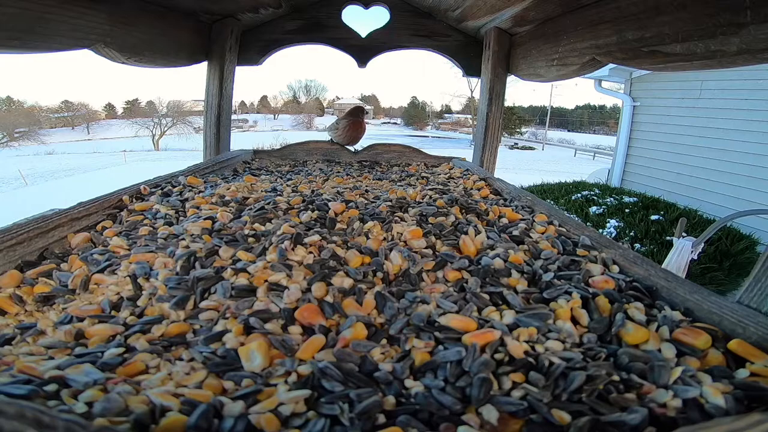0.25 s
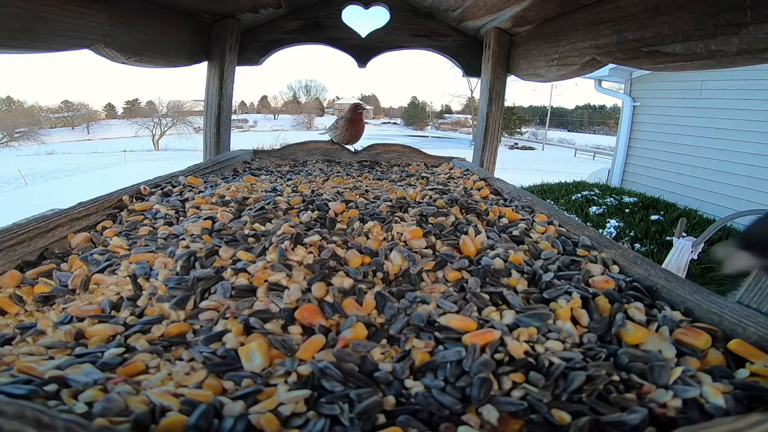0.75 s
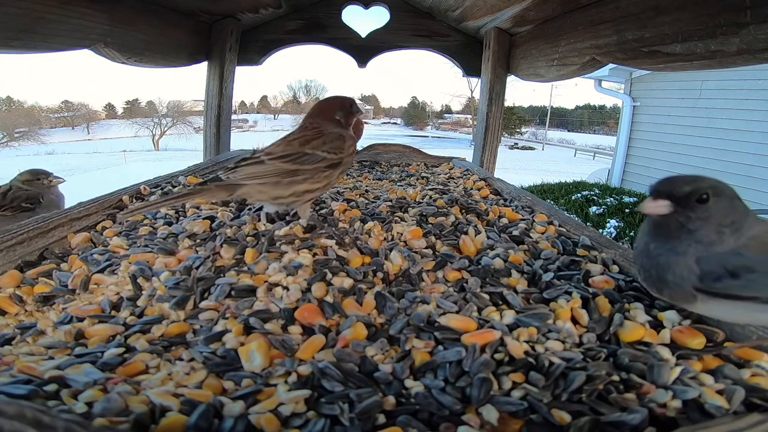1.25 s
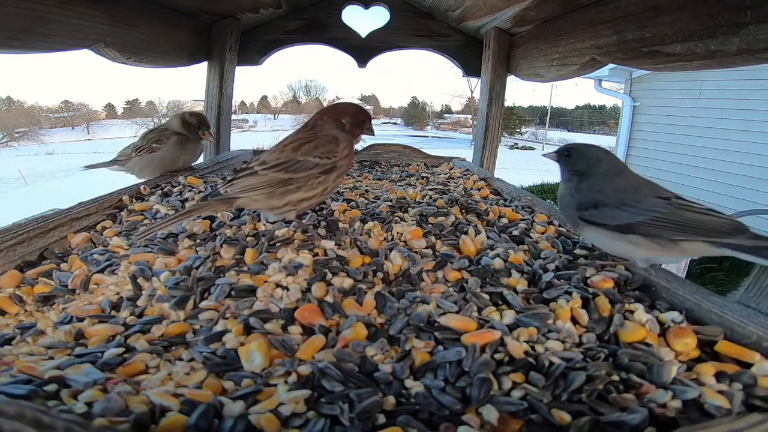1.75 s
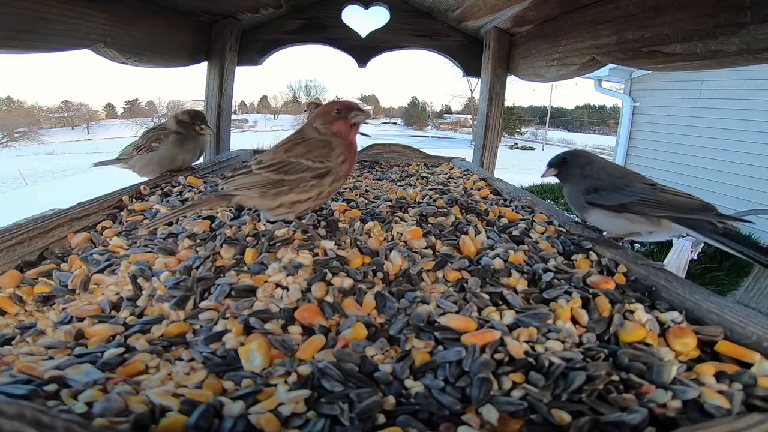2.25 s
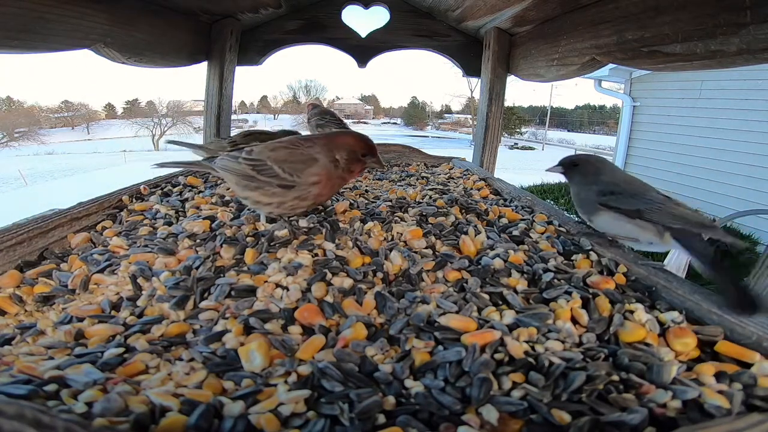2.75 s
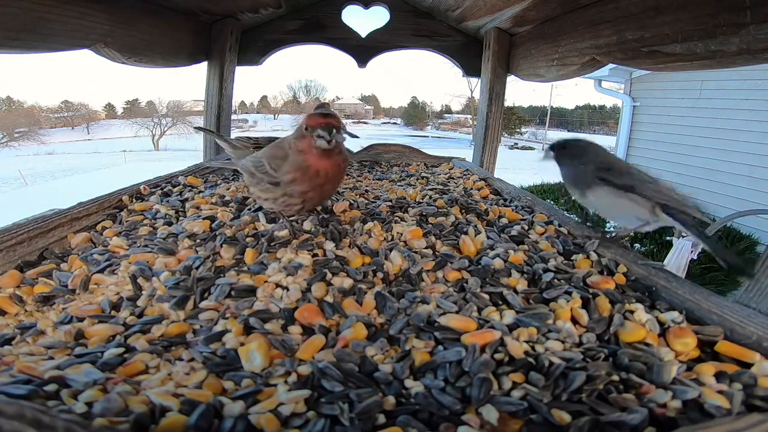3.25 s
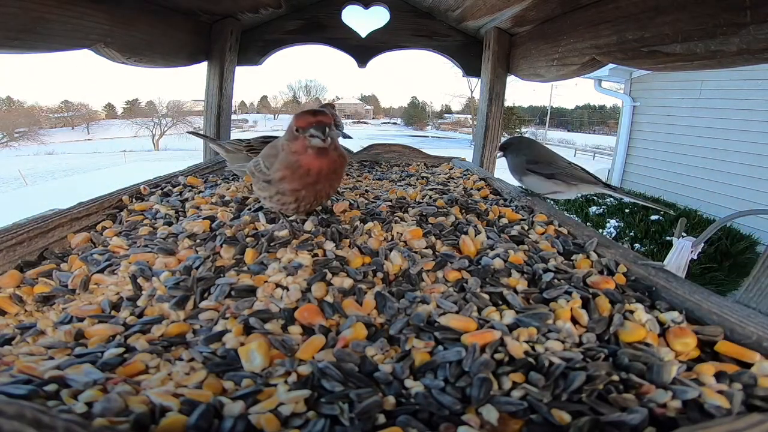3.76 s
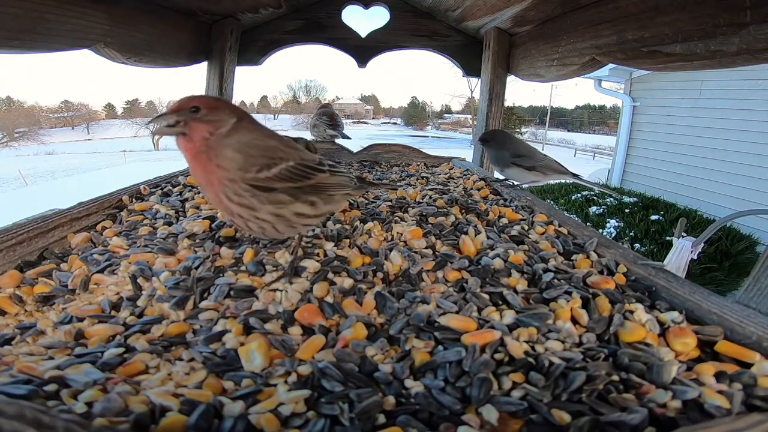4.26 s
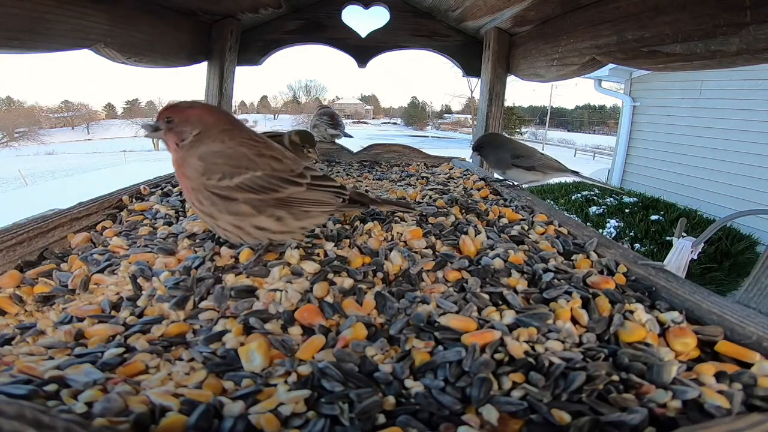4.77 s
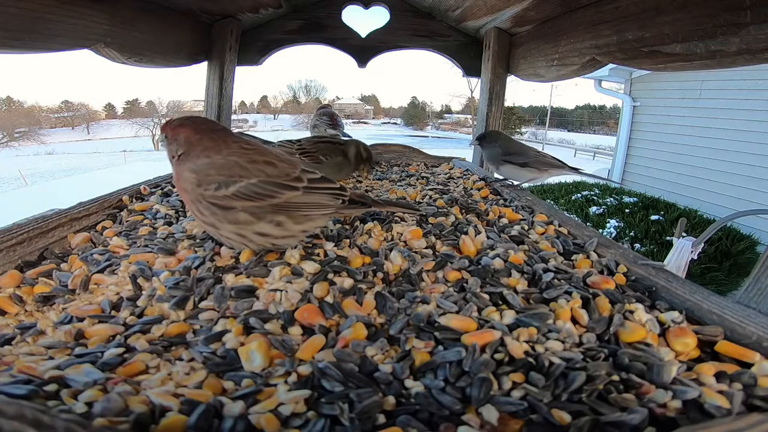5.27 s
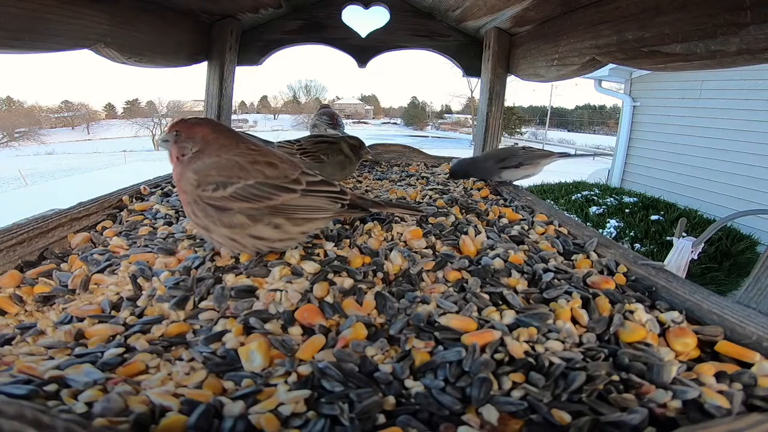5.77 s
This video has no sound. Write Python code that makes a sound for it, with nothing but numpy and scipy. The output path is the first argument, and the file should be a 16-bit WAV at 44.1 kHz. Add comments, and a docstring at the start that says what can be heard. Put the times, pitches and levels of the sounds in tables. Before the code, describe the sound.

At 0 s a wavering low hum with a dull rush, stronger on the right, fades out by about 0.85 s. A faint, high, warbling chirp droops near 0.4 s as soft seed rustle, distant traffic drone and slight hiss fade in. Around 1.0-1.3 s birds land: clustered muffled thuds on ringing boards, thin woody pings and quick husk ticks. A sharp bright crack comes at 1.54 s, then scattered ticks, shuffles and low thumps near 2 s. Dense dry clicking and stirring runs 3.3-3.75 s, with a wing puff thumping the microphone at 3.47. Another brisk scuffle follows at 4.1-4.2 s, then a quieter spell. Ticks cluster at 4.7; a firm woody knock lands at 5.06 and a husk burst at 5.65, among low air puffs. Nibbling grows narrower and calmer by 4.3 s, continuing to 6 s.

```python
"""The soft sounds fade in first, while a wavering low hum, mostly on the right, dies away; one bird chirps.
Small birds land, hop and peck in a deep bed of seed on a roofed wooden platform with a microphone on its edge.
Noise bursts make husks tick and rustle; feet thud by pushing ringing boards; claws and beaks ping the thin rim.
Later the rustle of nibbling narrows in colour as the birds settle to feed. Slow pulses and low noise make
puffs and gusts of air on the microphone; shaped noise makes the far traffic drone."""
import sys
import numpy as np
from scipy import signal
from scipy.fft import rfft, irfft
from scipy.io import wavfile
from scipy.ndimage import uniform_filter1d

SR = 44100
rng = np.random.default_rng(int(sys.argv[2]) if len(sys.argv) > 2 else 0)


def inscribe(sig):
    """Save sig as 16-bit PCM at rate SR to the path in sys.argv[1].

    A 1-D sig is mono; a 2-D sig holds one channel per row.
    Samples are clipped to [-1, 1] before scaling.
    """
    pcm = np.round(np.clip(np.atleast_2d(sig).T, -1, 1) * 32767)
    wavfile.write(sys.argv[1], SR, pcm.astype(np.int16))


def ratio_of_db(decibels):
    """Turn decibels (scalar or array-like) into linear amplitude factors; 0 dB maps to 1."""
    return 10 ** (np.asarray(decibels, float) / 20)


N = 265437
T = np.arange(N) / SR

SPLINTER_DB = 3.5  # scatter of the splinters' strength
SNAP_DB, SNAP_S = 8, .00012  # first crack over the crunch, and its decay
CRUNCH_RISE_S, CRUNCH_FALL_S, HUSK_RING_S = .0002, .0013, .0022
TICK_FALL_DB = 10.5  # level lost one octave from a tick's colour
TICK_FLANK_DB = (3.5, 0.5)  # dull and bright part against the middle
# Husks cracked, dropped or kicked. Each row: start in seconds, level in dB before the seed bed colours it,
# colour in octaves above 1 kHz.
HUSK_TICKS = [(0.2815, -50, 1.7), (0.4373, -52, 2.1), (0.45, -55, 1.74), (0.5306, -43, 2.1),
              (1.011, -39, 1.95), (1.052, -47, 2), (1.09, -53, 1.7), (1.106, -45, 2.6), (1.146, -48, 2.7),
              (1.169, -32.5, 2), (1.214, -46, 2.8), (1.258, -35, 2.2), (1.5367, -23, 3.8),
              (1.682, -45, 1.6), (1.6912, -45, 1.17), (1.7182, -45, 1.54), (1.7386, -42, 2),
              (1.767, -54, 2.9), (1.997, -45.5, 1.57), (2.1544, -53, 2.1), (2.226, -40.5, 1.8),
              (2.24, -52, 1.7), (2.27, -58, 1.5), (2.2946, -37.5, 1.9), (2.415, -49, 3.2), (2.4335, -44, 3),
              (2.501, -47, 2.9), (2.667, -46, 2.2), (2.8562, -36, 1.95), (2.8572, -47, 1.65),
              (2.9698, -46, 1.8), (2.974, -33.5, 2.34), (2.976, -37.5, 1.37), (3.1128, -39.5, 1.45),
              (3.193, -41, 1.93), (3.235, -48, 2.7), (3.262, -47, 2.5), (3.2853, -49, 2.2),
              (3.303, -42, 2.4), (3.308, -33, 2.1), (3.322, -33, 1.6), (3.337, -34.5, 2.5),
              (3.347, -35.5, 1.66), (3.373, -36.5, 3.2), (3.375, -37, 2.4), (3.384, -45, 2),
              (3.415, -45.5, 3.5), (3.425, -30.5, 1.44), (3.429, -39, 1.9), (3.4405, -52, 2.7),
              (3.4433, -32, 1.56), (3.4601, -33.5, 1.64), (3.5277, -46.5, 2.7), (3.591, -43, 3.5),
              (3.597, -45.5, 2), (3.602, -43, 3.2), (3.65, -45, 3.4), (3.6683, -44.5, 1.46),
              (3.6858, -28.5, 1.64), (3.695, -39, 3.9), (3.716, -31, 3.2), (3.72, -35.5, 1.54),
              (3.728, -47, 1.2), (3.738, -48, 1.8), (3.9066, -46.5, 2.6), (3.951, -31, 1.55),
              (3.9792, -41.5, 1.73), (3.993, -44, 1.7), (4.045, -44, 2.1), (4.091, -32, 1.3),
              (4.0917, -49, 1.6), (4.1549, -32, 1.16), (4.1558, -24.5, 1.53), (4.1587, -41, 2.9),
              (4.165, -31, 1.5), (4.1678, -34, 1.65), (4.174, -46, 2), (4.248, -71, 1.4), (4.328, -55, 3.3),
              (4.3375, -50.5, 2.2), (4.371, -50, 2.9), (4.41, -58, 2.9), (4.426, -66, 1.7),
              (4.655, -58, 2.6), (4.6643, -42, 2.7), (4.668, -33.5, 2.55), (4.6745, -52, 3.5),
              (4.6819, -30.5, 2.64), (4.7288, -31.5, 2.3), (4.7345, -35.5, 2.05), (4.736, -34, 2.4),
              (4.8186, -32.5, 2.26), (4.831, -41, 2.1), (4.95, -40, 2.24), (5.056, -42, 2.5),
              (5.064, -33.5, 1.25), (5.183, -48, 1.4), (5.427, -41, 3), (5.524, -52, 2.2),
              (5.6518, -31, 1.45), (5.6559, -30, 2.1), (5.658, -34, 2.1), (5.668, -25, 2), (5.67, -25, 1.2),
              (5.71, -42.5, 2.8), (5.72, -44.5, 2), (5.859, -31, 1.68), (5.904, -42, 2.2)]
# Where a husk may ring, one row each for the middle, dull and bright parts of its sound.
# Each row: lowest pitch in Hz, highest pitch in Hz.
HUSK_PITCHES = [(3300, 5400), (1250, 2900), (5700, 7400)]


def ticks():
    """Each husk snaps, splinters for a few ms and rings at its own pitches; its energy is spread over 1 ms."""
    husks = HUSK_TICKS + strays()
    drive, t = np.zeros((3, N + 1024)), np.arange(1024) / SR
    splinter_db = SPLINTER_DB * rng.exponential(size=(len(husks), 1, 1024))
    grit = rng.standard_normal((len(husks), 3, 1024)) * ratio_of_db(splinter_db)
    lowest, highest = np.transpose(HUSK_PITCHES)
    pitches = lowest + (highest - lowest) * rng.random((len(husks), 3))
    snap = ratio_of_db(SNAP_DB) * np.exp(-t / SNAP_S)
    crunch = (1 - np.exp(-t / CRUNCH_RISE_S)) * np.exp(-t / CRUNCH_FALL_S)
    for (s, db, octaves), splinters, hz in zip(husks, grit, pitches):
        ring = np.sin(2 * np.pi * hz[:, None] * t) * np.exp(-t / HUSK_RING_S)
        burst = splinters * (crunch + snap) + 0.45 * ring
        burst = burst / np.linalg.norm(burst, axis=1, keepdims=True) * np.sqrt(SR / 1000)
        i = int(s * SR)
        drive[:, i:i + 1024] += part_gains(db, octaves, TICK_FALL_DB) * burst
    return seed(*drive[:, :N] * ratio_of_db(flanks(TICK_FLANK_DB)))


STRAYS_PER_S, STRAY_OCTAVES = 6, (1.7, 2.7)  # colour range above 1 kHz
STRAY_DB, STRAY_SPREAD_DB = -59, 9  # faintest before the fade-in; range above it


def strays():
    """Rows like HUSK_TICKS for faint ticks that fall by chance, more of them weak than strong."""
    when, size, colour = rng.random((int(STRAYS_PER_S * T[-1]), 3)).T
    seconds = when * T[-1]
    db = STRAY_DB + STRAY_SPREAD_DB * size ** 2 + np.interp(seconds, T, fade())
    return list(zip(seconds, db, np.interp(colour, [0, 1], STRAY_OCTAVES)))


SHUFFLE_FALL_DB = 5  # level lost one octave from a stir's colour
SHUFFLE_FLANK_DB = (4, 4)  # dull and bright part against the middle
SCATTER_DB, SCATTER_DB_PER_DB, SCATTER_MS = -28, 0.48, 22  # seeds trickling after each listed tick
SCATTER_DB_PER_OCTAVE = -4.5  # dull kicks scatter more seed than bright cracks in the beak
# Feet and wings stirring the seed. Each row: time of the peak in seconds, length in ms,
# level in dB before the fade-in and the seed bed colour it, colour in octaves above 1 kHz.
SEED_STIRS = [(0.261, 130, -62, 1.64), (.4, 620, -64, 1.72), (0.525, 31, -51, 1.3), (.629, 38, -62, 1.4),
              (0.827, 100, -66.5, 1.8), (0.974, 110, -64, 1.1), (1.006, 43, -54, 1.83),
              (1.053, 106, -54.5, 1.23), (1.093, 12, -55, 1.9), (1.143, 22, -48.5, 2.3),
              (1.169, 155, -53.5, 1.95), (1.159, 23, -51, 2.1), (1.174, 39, -50, 0.92),
              (1.208, 35, -51, 2.1), (1.254, 52, -50.5, 2.13), (1.289, 48, -54.5, 2), (1.54, 28, -49, 2.2),
              (1.655, 49, -63, 1), (1.683, 74, -51.5, 3.66), (1.715, 40, -54, 1.9), (1.742, 56, -54, 1.7),
              (1.868, 18, -51.5, 1.63), (2.158, 36, -63, 1.25), (2.2, 49, -55, 1.75),
              (2.239, 71, -53.5, 2.05), (2.325, 42, -55, 1.6), (2.433, 39, -54.5, 1.65),
              (2.508, 19, -57, 1.9), (2.671, 43, -57, 3.1), (2.782, 37, -54.5, 2.15),
              (2.807, 35, -52.5, 1.6), (2.868, 80, -58, 3.4), (3.011, 106, -58, 2.1), (3.195, 31, -53, 2.2),
              (3.307, 25, -48.5, 1.8), (3.323, 11, -47, 2.3), (3.381, 35, -45, 1.78),
              (3.431, 89, -52.5, 2.8), (3.506, 26, -49.5, 2), (3.635, 18, -57, 2.1),
              (4.083, 34, -46.5, 2.4), (4.108, 19, -41.5, 1.95), (4.127, 18, -41, 1.6),
              (4.733, 74, -54, 2.1), (4.953, 150, -67, 2.2), (5.074, 91, -54, 0.44),
              (5.133, 29, -52.5, 0.98), (5.23, 31, -58.5, 1.4), (5.306, 18, -58, 1.6),
              (5.616, 25, -59, 1.8), (5.861, 7.1, -43, 2), (5.904, 46, -51, 1.2)]


def shuffles():
    """Each stir of many seed contacts swells quickly and settles slower; a trickle follows each listed tick."""
    trickles = []
    for s, db, octaves in HUSK_TICKS:
        trickle_db = SCATTER_DB + SCATTER_DB_PER_DB * db + SCATTER_DB_PER_OCTAVE * octaves
        trickles.append((s + 0.0021, SCATTER_MS, trickle_db, octaves))
    power = np.zeros((3, N))
    for s, ms, db, octaves in SEED_STIRS + trickles:
        u = (T - s) * 1000 / max(ms, 4)
        shape = np.exp(-np.where(u < 0, -4.5 * u, 2.6 * u) ** 1.7)
        power += part_gains(db, octaves, SHUFFLE_FALL_DB) ** 2 * shape
    gain = np.sqrt(power) * ratio_of_db(fade() + flanks(SHUFFLE_FLANK_DB))
    return seed(*gain * grains(share=.1, spread_db=2.0, flurry_db=4.0))


NIBBLE_DB, NIBBLE_DB_PER_DB = -68, 0.29  # at bustle 0 dB; nibbling follows the bustle less steeply
NIBBLE_SETTLED_DB = 4  # gained as the birds settle to feed
NIBBLE_FLANK_DB = (1.5, -1)  # dull and bright part against the middle
HOLLOW_HZ, HOLLOW_DB = (3830, 3970), -2  # the band that the space under the roof favours


def rustle():
    """Nibbling makes a soft, dense bed of contacts; the hollow under the roof comes to favour a narrow band."""
    db = NIBBLE_DB + NIBBLE_DB_PER_DB * bustle() + fade() + flanks(NIBBLE_FLANK_DB)
    db = db + NIBBLE_SETTLED_DB * ramp(SETTLE_FROM_S, SETTLE_TO_S)
    bed = seed(*ratio_of_db(db) * grains(share=.4, spread_db=2.0, flurry_db=1.2))
    hollow_gain = ratio_of_db(HOLLOW_DB + 2.7 * walk(8)) * ramp(1.0, SETTLE_TO_S)
    return bed + hollow_gain * band(bed, *HOLLOW_HZ, order=1)


# How busily the birds shift about. Each row: time in seconds, activity in dB.
BUSTLE_LEVELS = [(.02, -11), (.23, -13.5), (.6, -0.5), (.85, -13.5), (1.13, 5.5), (1.4, -4.5), (1.65, 2),
                 (1.95, -2), (2.75, -0.5), (2.89, -6.5), (3.46, 2), (3.61, -14.5), (4.02, -10), (4.22, -3),
                 (4.55, -12.5), (4.94, -8), (5.12, 2.5), (5.53, -13), (6.02, -3.5)]


def bustle():
    """Activity of the birds in dB over time, which drives both the nibbling and the trembling boards."""
    s, db = np.transpose(BUSTLE_LEVELS)
    return np.interp(T, s, db)


FOOT_DAMPING = .55  # share of the ring time left under a gripping foot
PUSH_CYCLES = (1.5, 4.0)  # length of a push, low and upper modes
TREMBLE_DB = -39  # at bustle 0 dB
# Ways the platform vibrates. Each row: pitch in Hz, strength in dB (upper modes in a blow, low ones in the
# tremble), seconds to die by 60 dB with no foot on it.
BOARD_MODES = [(155.3, -40.5, 0.11), (186, -6.5, 0.21), (239.4, 4, 0.097), (303.6, -1.5, 0.14),
               (501.5, -1.5, 0.11), (607, -0.5, 0.038), (737, -8.5, 0.11)]
# Feet and beaks on the boards. Each row: start in seconds, push on the low modes in dB,
# pitch in Hz of the boards under the blow, push on the upper modes in dB.
BOARD_BLOWS = [(0.247, -38, 314, -47), (0.326, -26.5, 291, -50), (0.458, -38.5, 298, -42.5),
               (0.532, -22.5, 294, -54), (0.634, -27, 305, -66), (0.831, -27, 207, -46),
               (0.976, -16, 216.6, -46), (1.011, -6, 320, -39), (1.02, -17, 310, -53),
               (1.033, -14, 202.5, -23), (1.055, -21, 186, -31), (1.11, -25, 225, -41),
               (1.142, -37, 257, -31.5), (1.157, -16, 186, -36), (1.168, -30, 186, -33),
               (1.218, -25, 180, -67), (1.247, -25.5, 186, -45), (1.262, -18, 163, -50),
               (1.552, -28, 198, -35), (1.584, -21, 232, -35), (1.679, -22, 255, -32.5),
               (1.699, -23, 294, -43), (1.739, -20.5, 252, -43), (1.877, -17, 234, -63),
               (2.004, -15, 243, -63), (2.02, -12, 213.4, -58), (2.078, -14.5, 215, -57),
               (2.37, -16, 211, -65), (2.465, -18.5, 316, -45), (2.666, -38, 301, -57),
               (2.804, -30, 187, -44), (2.969, -29.5, 188, -39), (3.114, -27, 187, -36),
               (3.444, -23.5, 235, -43), (3.496, -29.5, 176, -53), (4.118, -52, 163, -37),
               (4.204, -28.5, 186, -61), (4.732, -30, 251, -41), (4.78, -30.5, 291, -62),
               (5.063, -14, 265, -32.5), (5.147, -41, 260, -48), (5.632, -35, 196, -69)]


def platform():
    """Soft pushes ring the board modes nearest the spot struck; shifting feet keep the low ones trembling."""
    feet = ratio_of_db(2.0 * walk(25)) * rng.standard_normal(N)
    blows, tremble = 0, 0
    for hz, mode_db, t60 in BOARD_MODES:
        low = hz < 400
        shifting = low * ratio_of_db(mode_db + 1.5 * walk(6)) * feet
        tremble = tremble + mode(shifting, hz, FOOT_DAMPING * t60)
        # the foot gives with the board, so the ring builds over the length of the push
        window = np.hanning(int(PUSH_CYCLES[0 if low else 1] * SR / hz))
        swing = np.cos(2 * np.pi * hz * np.arange(len(window)) / SR)
        push = window / window.sum() * 2 * swing
        force = np.zeros(N)
        for s, db, spot_hz, upper_db in BOARD_BLOWS:
            near = 1 / (1 + (np.log(hz / spot_hz) / 0.087) ** 2)
            strength = ratio_of_db(db) * near if low else ratio_of_db(upper_db + mode_db)
            i = int(s * SR)
            force[i:i + len(push)] += strength * push
        blows = blows + mode(force, hz, FOOT_DAMPING * t60)
    return blows + ratio_of_db(TREMBLE_DB + bustle()) * unit(tremble)


# Claws and beaks on the thin rim of the tray. Each row: start in seconds, level in dB,
# pitch in Hz before each spot shifts it a little, seconds to die by 60 dB.
RIM_PINGS = [(0.5307, -41, 2220, 0.037), (0.9692, -49, 2170, 0.066), (1.0067, -34, 2194, 0.04),
             (1.047, -34, 2186, 0.061), (1.073, -43.5, 1760, 0.027), (1.0814, -44, 2190, .04),
             (1.092, -44, 2130, .04), (1.112, -45, 2480, 0.037), (1.133, -45, 2200, .05),
             (1.155, -42, 2230, 0.056), (1.549, -48, 2230, 0.08), (1.6906, -40, 2130, .025),
             (1.9939, -42.5, 2120, .04), (5.0634, -21.5, 1310, 0.012), (5.063, -24.5, 1890, 0.013),
             (5.064, -27.5, 820, 0.048), (5.1812, -34, 2070, 0.012)]


def rim():
    """A short ping of thin wood: two close tones, their pitch a little different at each spot."""
    out, t = np.zeros(N + 4096), np.arange(4096) / SR
    spots = 1 + .015 * rng.standard_normal((len(RIM_PINGS), 2))
    for (s, db, hz, t60), spot in zip(RIM_PINGS, spots):
        lower = np.sin(2 * np.pi * hz * spot[0] * t)
        upper = .5 * np.sin(2 * np.pi * 1.07 * hz * spot[1] * t)
        envelope = ratio_of_db(db - 60 * t / t60) * (1 - np.exp(-t / .0007))
        i = int(s * SR)
        out[i:i + 4096] += envelope * (lower + upper)
    return out[:N]


GUST_RISE_DB_S, GUST_FALL_DB_S, CALM_DB = 99, 97, -67  # dB per second; level between gusts
# Gusts on the microphone. Each row: time of the crest in seconds, level in dB before the opening swell.
WIND_GUSTS = [(0.619, -32.5), (1.16, -49), (1.47, -37.5), (2.24, -35.5), (2.6, -49), (3.5, -45), (4.9, -59),
              (5.65, -44)]
# Single puffs of wingbeat air. Each row: time of the crest in seconds, level in dB.
WING_PUFFS = [(3.4, -37), (3.465, -25), (3.505, -34), (3.562, -31.5), (3.795, -41), (4.195, -46),
              (4.791, -32), (4.88, -41), (5.095, -32), (5.639, -31), (5.766, -36)]


def buffet():
    """Wind is a low rumble on the microphone; each puff pushes the membrane, with a swing back on both sides."""
    swell = np.clip((T - .45) / 0.4, 0, 1)
    gusts = 0
    for s, db in WIND_GUSTS:
        drop_db = np.where(T < s, GUST_RISE_DB_S * (s - T), GUST_FALL_DB_S * (T - s))
        gusts = gusts + ratio_of_db(db - drop_db)
    rumble = unit(band(rng.standard_normal(N), 12.2, 70.4, order=3))
    out = swell * (ratio_of_db(CALM_DB) + gusts) * rumble
    for s, db in WING_PUFFS:
        u = (T - s) / 0.0052
        swing_after = 0.65 * np.exp(-(u - 1.8) ** 2 / 4.9)
        swing_before = 0.5 * np.exp(-(u + 2.0) ** 2)
        out += ratio_of_db(db) * (np.exp(-u ** 2) - swing_after - swing_before)
    return out


CHIRP_DB, CHIRP_ATTACK_S, CHIRP_RELEASE_S = -54, .012, .022
CHIRP_S, CHIRP_BEND_S, CHIRP_END_S = .364, .410, .446
CHIRP_HZ, CHIRP_DROOP_HZ_S, CHIRP_SAG_HZ_S = 5250, 6000, 30000  # start pitch; slow fall; extra fall after the bend
CHIRP_WARBLE_HZ, CHIRP_WARBLES_PER_S = 125, 57


def chirp():
    """A short whistle that warbles and droops, then falls; a little hoarse and blurred by distance."""
    droop = CHIRP_DROOP_HZ_S * np.clip(T - CHIRP_S, 0, 1)
    sag = CHIRP_SAG_HZ_S * np.clip(T - CHIRP_BEND_S, 0, CHIRP_END_S - CHIRP_BEND_S)
    warble = CHIRP_WARBLE_HZ * np.sin(2 * np.pi * CHIRP_WARBLES_PER_S * (T - CHIRP_S))
    hz = CHIRP_HZ - droop - sag + warble * (1 - ramp(CHIRP_BEND_S, CHIRP_END_S))
    attack = ramp(CHIRP_S, CHIRP_S + CHIRP_ATTACK_S)
    release = 1 - ramp(CHIRP_END_S - CHIRP_RELEASE_S, CHIRP_END_S)
    blur = .9 + walk(900) + 1j * walk(900)
    whistle = (blur * np.exp(2j * np.pi * np.cumsum(np.maximum(hz, 3000)) / SR)).imag
    return attack * release * ratio_of_db(CHIRP_DB) * unit(whistle)


HUM_HZ, HUM_DB, HUM_FALL_DB_S = 46.43, -26.5, 34.5  # middle pitch; level before each side's gain; dB per second
# Colour of the rush that goes with the hum. Each row: frequency in Hz, relative level in dB per Hz.
RUSH_COLOUR = [(30, -2.5), (54, 5), (76, 2), (130, -13), (260, -26.5), (473, -34), (595, -39), (735, -32),
               (939, -51), (8240, -59), (10700, -101), (18100, -120)]


def hum():
    """A wavering low tone, weaker and later on the left, with a dull rush of its own on each side; it dies away."""
    waver = 1 + .06 * walk(20)
    phase = 2 * np.pi * np.cumsum(HUM_HZ * waver) / SR - np.array([[1.1], [0]])  # left, right
    tone = np.sqrt(2) * np.sin(phase) * ratio_of_db(np.array([[-6], [3]]))
    rush = np.array([unit(coloured(RUSH_COLOUR)) for _ in phase]) * ratio_of_db(np.array([[-9], [-4]]))
    ending = np.clip((.85 - T) / 0.082, 0, 1)
    return ending * ratio_of_db(HUM_DB - HUM_FALL_DB_S * T) * (tone + rush)


DRONE_DB = -54.5  # between 444 and 1300 Hz, before the slow swells and the fade-in
# Colour of distant traffic and air. Each row: frequency in Hz, relative level in dB per Hz.
DRONE_COLOUR = [(35, -38), (60, -65), (92, -53), (145, 1), (203, -2), (482, -7.5), (550, -15), (794, -5.5),
                (1160, -32.5), (1290, -24), (1430, -37), (2000, -62), (2600, -70), (4400, -120)]


def drone():
    """Far traffic is a blur of coloured noise that swells slowly."""
    air, swell_db = coloured(DRONE_COLOUR), 2.5 * walk(3)
    return air * ratio_of_db(DRONE_DB + swell_db) / np.std(band(air, 444, 1300, order=4))


# Colour of the seed bed, one list each for its middle, dull and bright parts.
# Each row: frequency in Hz, relative level in dB.
SEED_COLOURS = [
    [(2900, -25), (3600, -4), (4200, 1), (5200, -5), (6200, -7.5)],
    [(550, -19), (900, -11.5), (1350, -3.5), (1900, -4.5), (2700, -4), (3700, -1.5)],
    [(4800, -20), (5800, -1.5), (6900, -1), (8200, -16.5), (11000, -33), (15500, -55.5)],
]


def seed(*contacts):
    """Contacts heard through the seed bed, which colours its middle, dull and bright parts."""
    return sum(tint(part, colour) for part, colour in zip(contacts, SEED_COLOURS))


PART_OCTAVES = np.array([2.07, .93, 2.7])  # centres of the middle, dull and bright parts above 1 kHz


def part_gains(db, octaves, fall_db):
    """Gain of one contact in each part of the bed, less the further the part lies from its colour."""
    return ratio_of_db(db - fall_db * (PART_OCTAVES - octaves) ** 2)[:, None]


# the dull and bright parts sink as the birds settle to feed
SETTLE_FROM_S, SETTLE_TO_S, SETTLE_DB = 1.78, 4.31, (-7, -6.5)


def flanks(flank_db):
    """Gain in dB over time of the middle, dull and bright parts of the seed bed."""
    sinking = np.array(SETTLE_DB)[:, None] * ramp(SETTLE_FROM_S, SETTLE_TO_S)
    return np.vstack([0 * T, np.array(flank_db)[:, None] + sinking])


def grains(share, spread_db, flurry_db):
    """Tiny seed contacts on a share of the samples, in shared flurries; each part has its own contacts."""
    spread = spread_db * np.minimum(rng.exponential(size=(3, N)), 6.0)
    size = ratio_of_db(spread + flurry_db * walk(150))
    struck = rng.random((3, N)) < share
    return unit(rng.standard_normal((3, N)) * size * struck)


FADE_FROM_DB, FADE_START_S, FADE_END_S = -18, 0.14, 0.76


def fade():
    """Gain in dB of the soft sounds as they fade in."""
    return FADE_FROM_DB * (1 - ramp(FADE_START_S, FADE_END_S)) ** 2


def ramp(start_s, end_s):
    """Rises from 0 to 1 between two times."""
    return np.clip((T - start_s) / (end_s - start_s), 0, 1)


def walk(rate):
    """Random levels held 1 / rate seconds and smoothed twice."""
    k = int(SR / rate)
    held = np.repeat(rng.standard_normal(N // k + 1), k)
    return uniform_filter1d(uniform_filter1d(held, k), k)[:N]


def unit(x):
    """Scale to rms 1."""
    return x / np.sqrt(np.mean(x ** 2))


def band(x, lo_hz, hi_hz, order=2):
    """Keep the sound between two frequencies."""
    return signal.sosfilt(signal.butter(order, [lo_hz, hi_hz], "band", fs=SR, output="sos"), x)


def coloured(spectrum):
    """Noise with the given (Hz, dB) spectrum."""
    hz, db = np.transpose(spectrum)
    f = np.arange(N // 2 + 1) * SR / N + 1
    gain = ratio_of_db(np.interp(np.log(f), np.log(hz), db))
    return irfft(rfft(rng.standard_normal(N)) * gain, N)


def tint(x, spectrum):
    """Causal filter with the given (Hz, dB) shape, -60 dB outside it; white noise keeps its level."""
    hz, db = np.transpose(spectrum)
    f = np.arange(513) * SR / 1024 + 1
    gain = ratio_of_db(np.interp(np.log(f), np.log(hz), db, left=-60, right=-60))
    # folding the cepstrum puts the response as early as it can be
    cepstrum = irfft(np.log(gain))
    cepstrum[1:512] *= 2
    cepstrum[513:] = 0
    response = irfft(np.exp(rfft(cepstrum)))[:512]
    return signal.fftconvolve(x, response / np.linalg.norm(response))[:N]


def mode(x, hz, t60):
    """One decaying vibration; a unit blow rings it from amplitude 1."""
    pole = np.exp(2j * np.pi * hz / SR - np.log(1000) / (t60 * SR))
    return signal.lfilter([1], [1, -pole], x).imag


def scene():
    """One microphone feeds both channels; only the hum is spread."""
    boards = signal.sosfilt(signal.butter(5, 122., "high", fs=SR, output="sos"), platform())
    seeds = ticks() + shuffles() + rustle()
    feeder = seeds + boards + rim() + buffet() + chirp() + ratio_of_db(fade()) * drone()
    return feeder + hum()


def top_cut(x):
    """Nothing passes above the cut-off."""
    return signal.sosfilt(signal.butter(12, 15750, fs=SR, output="sos"), x)


def record(dry):
    """A faint treble hiss fades in; the very top, each channel's own, flares with the husks; a low-pass ends it."""
    common = unit(band(rng.standard_normal(N), 6600.0, 9000.0, order=1))
    own = np.array([unit(band(rng.standard_normal(N), 10500., 14500.)) for _ in dry])
    treble_power = uniform_filter1d(band(dry[0], 6200.0, 8000.) ** 2, size=130)
    flare = np.sqrt(np.abs(treble_power))
    top_gain = ratio_of_db(1.3 * fade() - 85) + ratio_of_db(-4.0) * flare ** 1.48
    hiss = ratio_of_db(fade()) * ratio_of_db(-76.0) * common + top_gain * own
    low_pass = signal.ellip(8, .2, 60, 15750, fs=SR, output="sos")
    heard = signal.sosfilt(low_pass, dry + hiss)
    return top_cut(heard)


dry = scene()
out = record(dry)
inscribe(out)
```